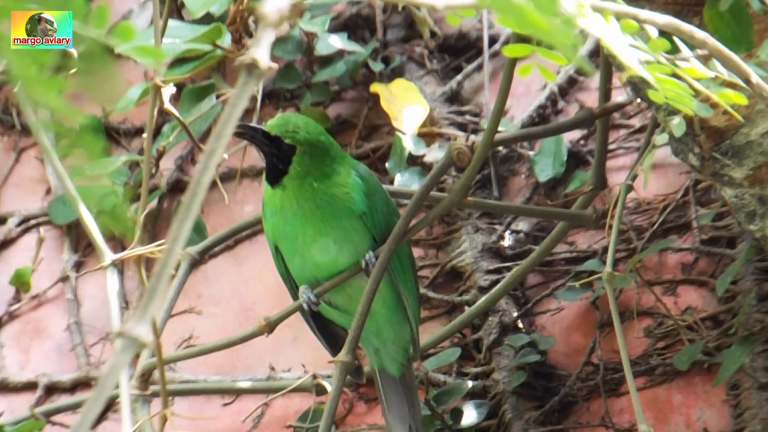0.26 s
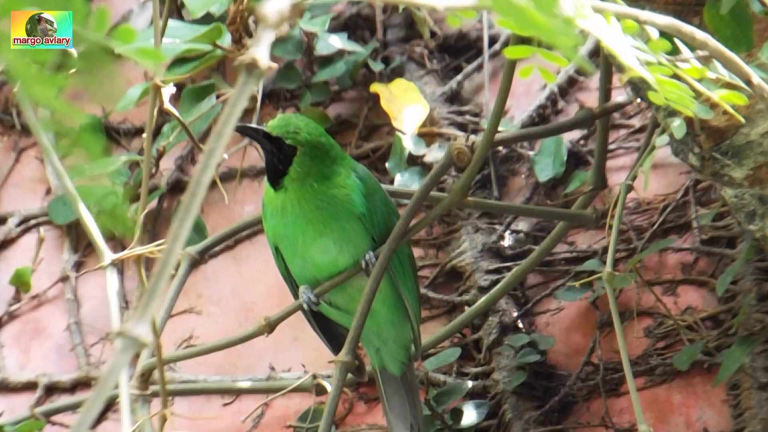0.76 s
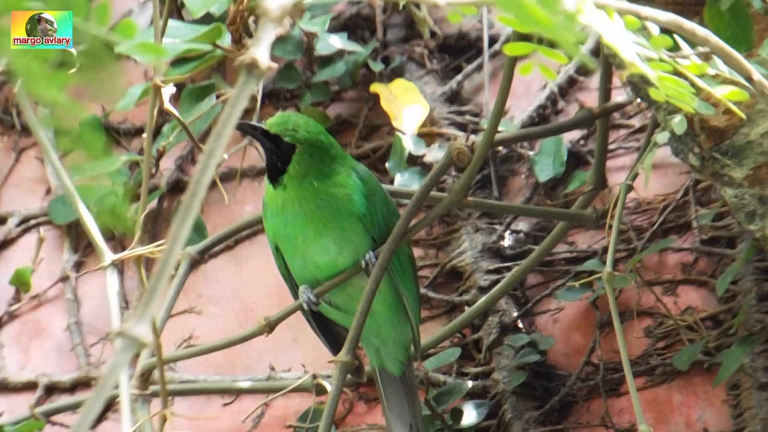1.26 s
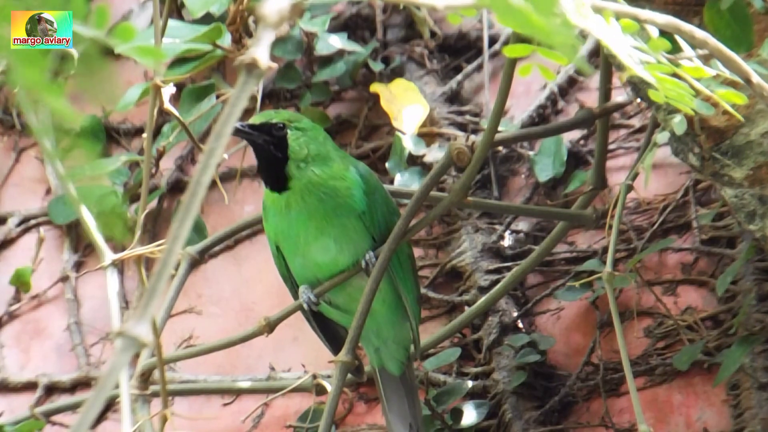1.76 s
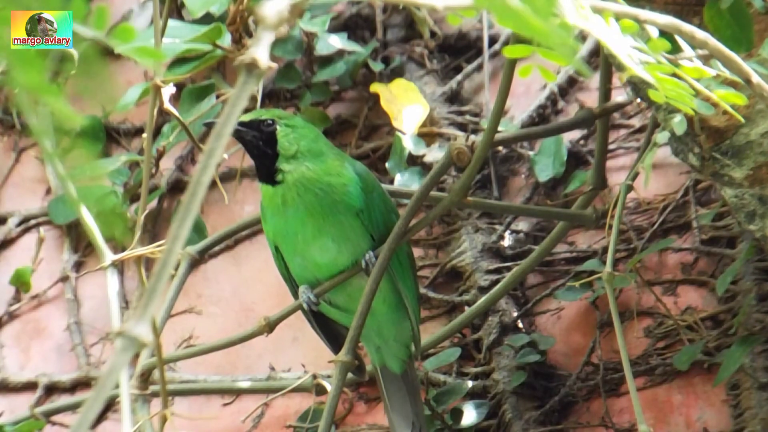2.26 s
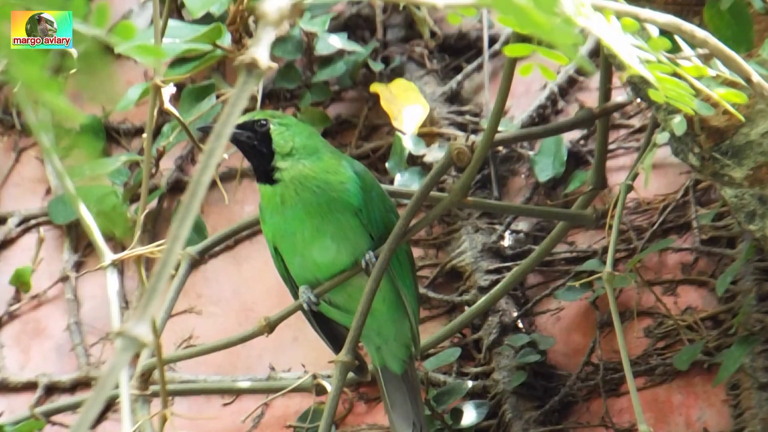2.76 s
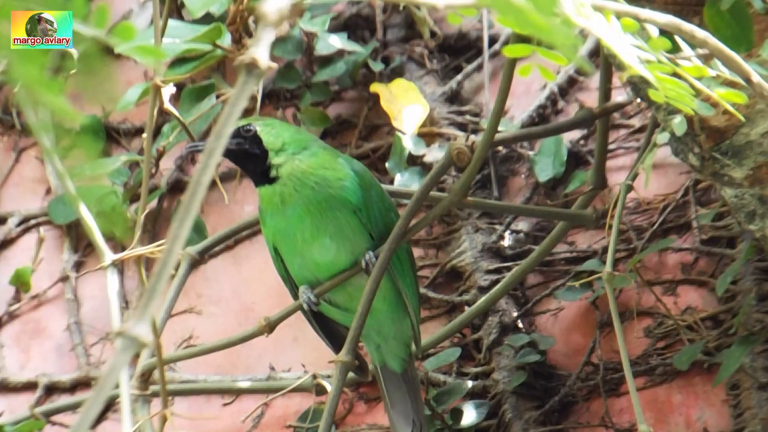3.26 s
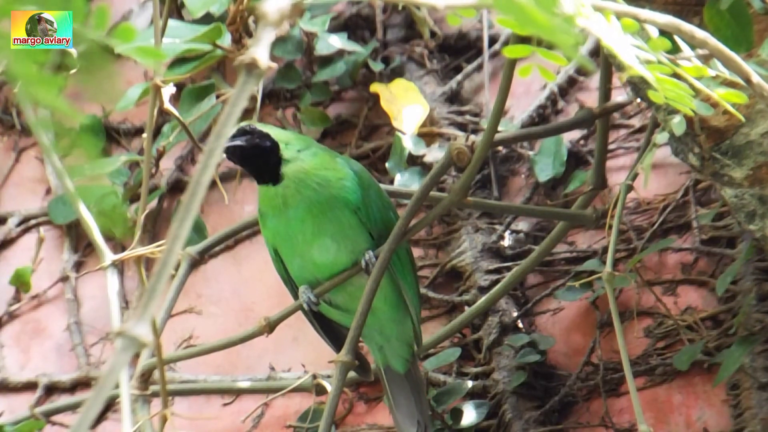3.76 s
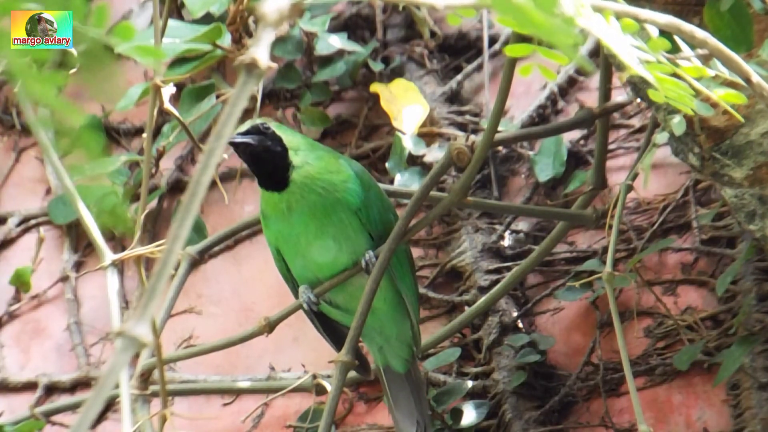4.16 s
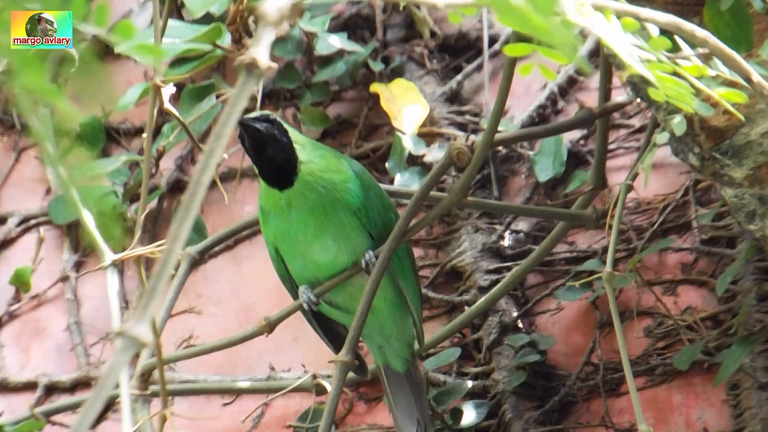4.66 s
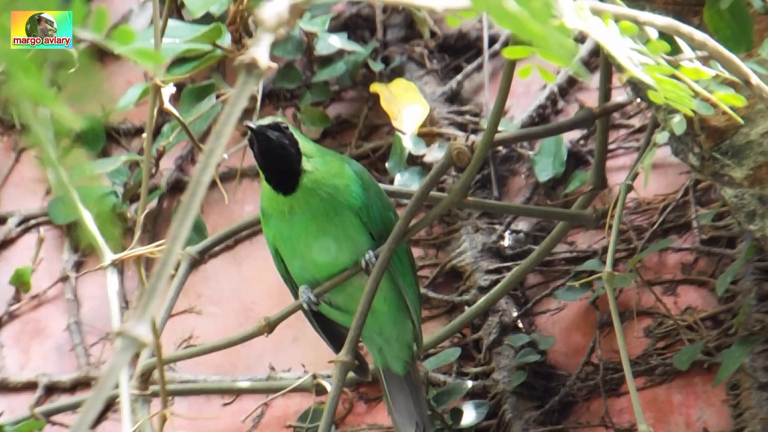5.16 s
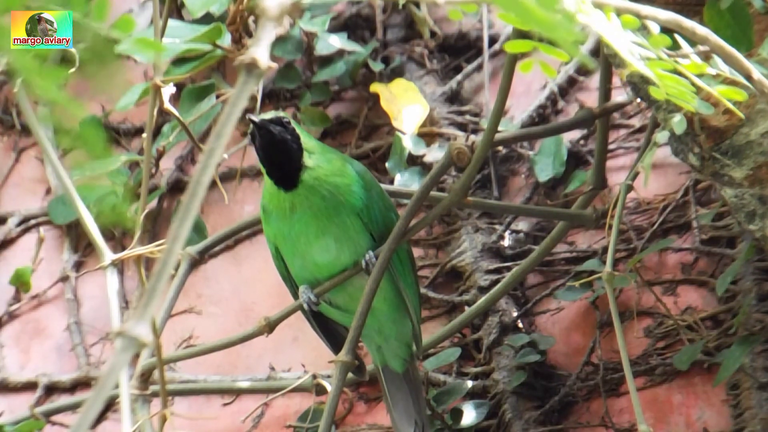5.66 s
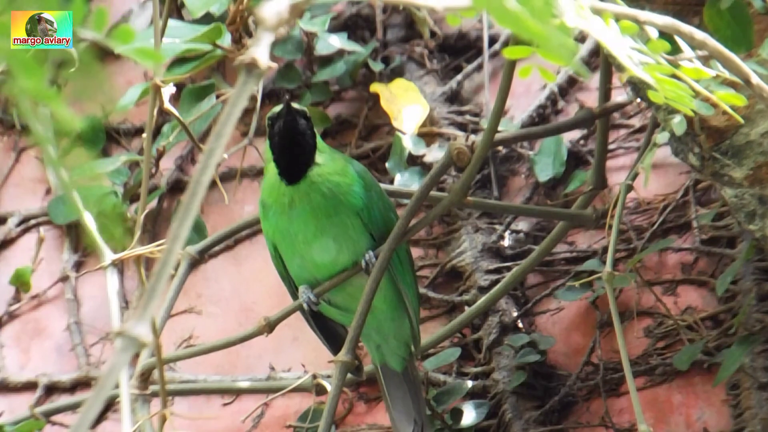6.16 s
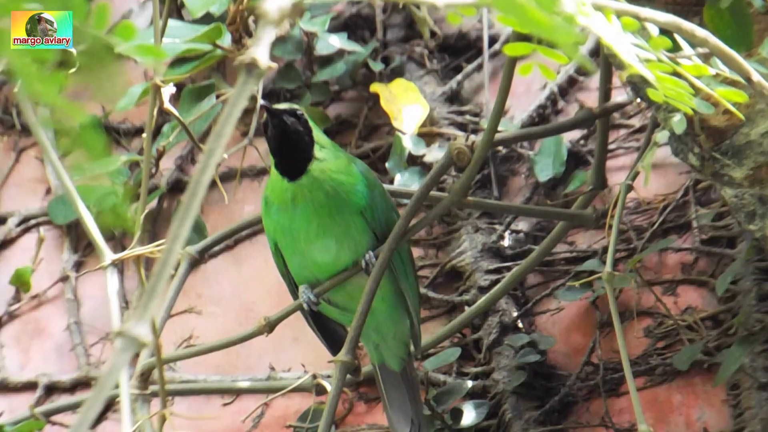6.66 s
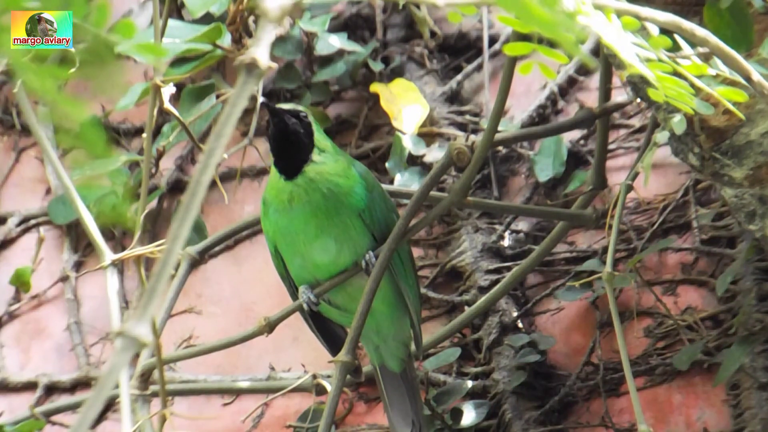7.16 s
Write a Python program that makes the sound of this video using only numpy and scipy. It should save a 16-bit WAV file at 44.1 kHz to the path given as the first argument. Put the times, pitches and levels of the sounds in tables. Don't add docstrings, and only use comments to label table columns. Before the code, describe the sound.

Inside a planted, walled aviary, dense varied birdsong starts at once, tumbling from chatter to buzzes and repeated downward phrases, most intense in the first four seconds. Brief squeaks lead to a sparser, sweeter melody of pure sliding whistles. Very faint low coos come from elsewhere. Far traffic hums and rumbles unevenly under a soft insect hiss. The close camera microphones pick up more wall reflection than direct sound, with automatic level control squeezing the loudest notes.

```python
import sys
import numpy as np
from scipy import signal
from scipy.fft import rfft, irfft, next_fast_len
from scipy.io import wavfile
from scipy.ndimage import uniform_filter1d, minimum_filter1d, map_coordinates

SR = 44100
rng = np.random.default_rng(int(sys.argv[2]) if len(sys.argv) > 2 else 0)


def master(y):
    cut = np.clip(np.atleast_2d(y).T, -1, 1)
    pcm = np.round(cut * 32767)
    wavfile.write(sys.argv[1], SR, pcm.astype(np.int16))


def decibels_to_gain(level_db):
    exponent = np.asarray(level_db, float) / 20
    return 10 ** exponent


N = 326340
LEAD = 0.3
BEAK = signal.butter(6, 2150, "high", fs=SR, output="sos")
STEADY, QUAVER, BURR, LOOSE, LISP, BUZZ = 0.01, 0.0275, 0.08, 0.1, 0.117, 0.19
PIPE = dict(overtone_db=-24.5, settle=1.8, rasp_db=-49, throb_db=3.5, soft=0.13)


def unit(x):
    return x / np.sqrt(np.mean(x ** 2) + 1e-20)


def along(points, hz):
    f, v = np.transpose(points)
    return np.interp(np.log(hz + 1), np.log(f + 1), v)


def wobble(rate, size):
    knots = rng.standard_normal(int(rate / 4) + 4)
    return map_coordinates(knots, [np.arange(size) * rate / SR])


def stereo(pair, colour):
    # frequency in Hz, likeness of left and right from 0 to 1.
    likeness = [(25, 0.95), (125, 0.21), (300, 0.4), (600, 0.81), (1500, 0.94), (4000, 0.93), (8000, 0.67),
                (13000, 0.1)]
    # frequency in Hz, left over right in dB.
    left_lean = [(25, 4), (125, -2), (500, 1.5), (1500, 2), (3000, 3), (5500, 7), (9000, 1), (13000, 1)]
    size = pair.shape[1]
    padded = next_fast_len(size + 8192)
    hz = np.fft.rfftfreq(padded, 1 / SR)
    spread = np.arccos(np.clip(along(likeness, hz), -1, 1)) / 2
    coloured = rfft(pair, padded) * decibels_to_gain(along(colour, hz))
    mid, side = coloured * [np.cos(spread), np.sin(spread)]
    tilt = decibels_to_gain(along(left_lean, hz) / 2)
    return irfft([(mid + side) * tilt, (mid - side) / tilt], padded)[:, :size]


def town():
    # time in seconds, traffic level in dB.
    traffic = [(0, -40), (1.05, -38.5), (2.08, -39.5), (2.49, -36.5), (3.54, -39.5), (3.9, -35.5),
               (4.72, -38), (5.44, -37), (7.4, -37)]
    # time in seconds, swell of the rumble in dB.
    passes = [(.62, 3.5), (1.05, 6), (2.7, -1.5), (4.9, 1), (5.45, 3.5), (7.35, 5)]
    # frequency in Hz, level in dB per Hz.
    hum_colour = [(70, -12.5), (120, 0), (260, -5), (390, -2.5), (470, -4.5), (580, -1.5), (1000, -4),
                  (1600, -6.5), (2300, -10), (4300, -11.5), (5600, -5), (7000, -12), (9000, -19),
                  (15500, -28)]
    # frequency in Hz, level in dB per Hz.
    rumble_colour = [(10, -20.5), (30, 2), (45, -5.5), (62, -1.5), (90, -9.5), (200, -32.5)]
    t = np.arange(N) / SR
    traffic_db = np.interp(t, *np.transpose(traffic))
    lumps_db = 0.4 * map_coordinates(rng.standard_normal(60), [t * 5.8])
    for s, db in passes:
        lumps_db = lumps_db + db * np.exp(-((t - s) / 0.14) ** 2)

    z = signal.stft(rng.standard_normal((2, N)), nperseg=512)[2]
    field = uniform_filter1d(rng.standard_normal(z.shape[1:]), 5, 0)
    field = uniform_filter1d(field, 12, 1)
    patches = decibels_to_gain(1.7 * np.tanh(unit(field)))
    patchy = signal.istft(z * patches, nperseg=512)[1][:, :N]
    hum = decibels_to_gain(traffic_db + 9) * unit(stereo(patchy, hum_colour))
    noise = rng.standard_normal((2, N))
    rumble = decibels_to_gain(traffic_db + 0.5 + lumps_db) * unit(stereo(noise, rumble_colour))
    return hum + rumble


def add(song, s, length, from_hz, to_hz, db, warble_hz,
        overtone_db, settle, rasp_db, throb_db, soft, root_db=0):
    # frequency in Hz, gain in dB.
    throat = [(1000, 18), (2300, -3.5), (3300, 4), (4600, 3.5), (5800, 2.5), (6800, -1.5), (8400, -6.5),
              (10000, -7.5), (13400, -16.5), (16000, -36)]
    u = np.linspace(0, 1, int(np.clip(length, 0.002, 0.24) * SR))
    flutter, throb, rattle = (wobble(rate, len(u)) for rate in (220, 90, 2600))
    hz = to_hz + (from_hz - to_hz) * (1 - u) ** settle + warble_hz * flutter
    phase = 2 * np.pi * np.cumsum(hz) / SR
    tone = 0
    for k in range(7):
        partial_hz = hz * (k + 1)
        partial_db = overtone_db * k + along(throat, np.abs(hz) * (k + 1))
        if k == 0:
            partial_db = partial_db + root_db
        audible = partial_hz < SR / 2
        tone = tone + decibels_to_gain(partial_db) * audible * np.sin((k + 1) * phase)
    tone = unit(tone)
    haze = signal.sosfilt(BEAK, rattle * tone)
    swell = decibels_to_gain(db + throb_db * throb) * np.abs(np.sin(np.pi * u ** 0.77)) ** soft
    song[round((s + LEAD) * SR):][:len(u)] += swell * (tone + decibels_to_gain(rasp_db) * haze)


def add_notes(song, notes, warble, **voice):
    for s, length, from_hz, to_hz, db in notes:
        add(song, s, length, from_hz, to_hz, db, warble * (from_hz + to_hz) / 2, **voice)


def chatter(song):
    # start in seconds, length in seconds, start Hz, end Hz, level in dB.
    loose_notes = [(-.08, 0.097, 3205, 3267, -17), (0, 0.08, 3592, 3140, -22),
                   (0.275, 0.092, 3900, 2650, -16), (0.401, 0.049, 3967, 2930, -12),
                   (0.457, 0.065, 3400, 3030, -20), (0.957, 0.032, 2306, 3245, -29.5),
                   (1.651, .11, 2580, 3300, -17.5), (1.8, 0.015, 3790, 2320, -10.5),
                   (3.094, .08, 2812, 3200, -20), (3.172, 0.074, 3303, 3090, -14),
                   (3.257, 0.046, 3920, 2890, -9.5), (3.692, 0.038, 2950, 2870, -30)]
    # start in seconds, length in seconds, start Hz, end Hz, level in dB.
    held_notes = [(0.042, 0.035, 2262, 1870, -22), (1.759, 0.039, 3346, 3400, -12.5),
                  (1.828, 0.028, 3406, 3280, -8), (1.836, 0.0235, 3044, 2820, -17),
                  (3.14, 0.031, 2576, 2770, -20.5), (3.2, 0.034, 3220, 2840, -20)]
    for notes, warble in [(loose_notes, LOOSE), (held_notes, QUAVER)]:
        add_notes(song, notes, warble, overtone_db=-3, settle=1.3, rasp_db=-4, throb_db=4.5, soft=0.21)


def risers(song):
    # start in seconds, length in seconds, start Hz, end Hz, level in dB.
    rising_notes = [(0.122, 0.033, 3820, 4256, -10.5), (0.235, 0.044, 4890, 5380, -15),
                    (3.327, 0.032, 4140, 5600, -9.5), (3.357, 0.031, 5400, 4420, -25)]
    add_notes(song, rising_notes, 0.0094,
              overtone_db=-6.5, settle=1.6, rasp_db=-2.5, throb_db=-3, soft=0.21)


def pipes(song):
    # start in seconds, length in seconds, start Hz, end Hz, level in dB.
    quavers = [(0.155, 0.11, 4300, 4140, -24), (.345, 0.0294, 6150, 5800, -12),
               (.425, 0.031, 6100, 5880, -18.5), (1.07, 0.024, 2550, 2100, -23.5),
               (1.395, 0.039, 2480, 2575, -18.5), (2.32, 0.024, 4350, 4880, -30),
               (2.368, 0.027, 2425, 2395, -21), (2.401, 0.029, 2290, 1980, -23.5),
               (2.42, 0.057, 2404, 2477, -21.5), (2.599, 0.049, 2091, 2160, -20.5),
               (3.306, 0.034, 3140, 4300, -11), (3.4, 0.014, 4450, 4760, -16),
               (4.645, 0.034, 1953, 1726, -29.5), (4.675, 0.052, 1690, 1847, -22),
               (5.492, 0.031, 1720, 1890, -30), (5.507, 0.038, 1850, 1375, -27),
               (6.545, 0.032, 2280, 2130, -22.5), (6.575, 0.012, 1970, 1780, -30),
               (6.976, 0.037, 4860, 4750, -26.5), (7.357, 0.067, 2140, 1760, -23)]
    # start in seconds, length in seconds, start Hz, end Hz, level in dB.
    whistles = [(0.972, 0.0235, 2744, 3207, -24), (.993, 0.023, 3207, 3090, -8.5),
                (1.025, 0.04, 3096, 2850, -18.5), (1.478, 0.026, 2593, 2580, -21),
                (1.619, 0.041, 2297, 2586, -19), (1.93, 0.032, 2440, 2430, -27),
                (2.14, 0.027, 2430, 2340, -21), (2.197, 0.03, 2460, 2450, -24)]
    # start in seconds, length in seconds, start Hz, end Hz, level in dB.
    flurries = [(2.468, 0.025, 5680, 4820, -15.5), (4.83, 0.035, 5280, 4240, -28),
                (3.98, 0.1, 2216, 2030, -27), (4.477, 0.025, 5080, 5040, -18.5),
                (4.486, 0.019, 3700, 3270, -19.5), (5.202, 0.038, 4810, 4280, -26.5),
                (6.55, 0.061, 5420, 4220, -26.5), (6.777, 0.18, 5900, 5680, -42),
                (6.88, 0.043, 5840, 3800, -38), (7.02, 0.032, 4640, 3390, -30)]
    for notes, warble in [(quavers, QUAVER), (whistles, STEADY), (flurries, LISP)]:
        add_notes(song, notes, warble, **PIPE)


def chips(song):
    # start in seconds, length in seconds, start Hz, end Hz, level in dB.
    sweeps = [(0.31, 0.0043, 6400, 5420, -20), (0.335, 0.0043, 6440, 5350, -4.5),
              (1.03, 0.0072, 6400, 5400, -12.5), (1.031, 0.012, 5070, 4260, -20),
              (1.303, 0.005, 6400, 5300, -23), (1.66, .012, 7830, 4570, -25),
              (1.708, 0.0054, 6150, 5600, -16), (1.753, 0.012, 7420, 5250, -14),
              (2.47, .006, 8560, 5500, -15.5), (3.104, .015, 7980, 4450, -25),
              (3.215, 0.0093, 7630, 5740, -12), (3.505, 0.016, 8380, 4880, -16.5)]
    add_notes(song, sweeps, 0.04, overtone_db=-10, settle=1.3, rasp_db=-4, throb_db=2, soft=0.3)


def buzzes(song):
    # start in seconds, length in seconds, start Hz, end Hz, level in dB.
    harsh_notes = [(0.53, 0.21, 2980, 4300, -29), (1.245, 0.025, 4200, 2550, -21),
                   (1.66, 0.12, 3100, 6510, -36), (2.0, 0.047, 3000, 4380, -16),
                   (3.47, 0.031, 4250, 3020, -20.5), (3.795, 0.12, 4365, 3900, -23.5),
                   (3.835, 0.123, 4220, 4260, -22), (3.91, 0.16, 4220, 3926, -16.5),
                   (4.0, 0.15, 3920, 3564, -18)]
    # start in seconds, length in seconds, start Hz, end Hz, level in dB.
    burrs = [(2.715, 0.066, 2984, 3833, -20.5), (3.5, 0.048, 4380, 4460, -34), (3.85, .23, 3080, 2460, -29)]
    for notes, warble in [(harsh_notes, BUZZ), (burrs, BURR)]:
        add_notes(song, notes, warble, overtone_db=-7, settle=1.4, rasp_db=4.5, throb_db=-2.5, soft=1)


def refrain(song):
    # seconds after the phrase starts, length in seconds, start Hz, end Hz, warble in Hz.
    phrase = [
        (-.006, .04, 2826, 3689, 218.5),
        (0.015, 0.0245, 2644, 2284, 150),
        (0.032, 0.052, 3427, 3283, 80.2),
        (0.082, 0.0262, 2883, 2813, 65),
        (0.107, .09, 2159, 1723, 133.8),
        (0.194, .12, 1741, 1230, 95.5),
    ]
    # start in seconds, then levels in dB of the squeak, rasp, held note and step.
    renditions = [(0.589, -18, -12, -9, -18), (1.235, -24, -12.5, -7.5, -11),
                  (1.993, -18, -13, -6.5, -11.5), (2.662, -14.5, -15, -8, -10),
                  (3.471, -31, -15.5, -11, -12), (4.172, -17.5, -8.5, -8.5, -12)]
    for s, squeak_db, rasp_db, held_db, step_db in renditions:
        levels = [rasp_db, squeak_db, held_db, step_db, -21.5, -31.5]
        for (after, length, from_hz, to_hz, warble_hz), db in zip(phrase, levels):
            add(song, s + after, length, from_hz, to_hz, db, warble_hz,
                overtone_db=-4.5, settle=1.3, rasp_db=-8, throb_db=1.5, soft=0.48)


def coos(song):
    # start in seconds, length in seconds, pitch in Hz, level in dB.
    low_calls = [(0.741, 0.15, 293.6, -46.5), (2.9, 0.15, 497, -43), (4.16, 0.085, 909, -38),
                 (5.042, 0.17, 564, -43), (5.8, 0.084, 1118, -40), (6.352, 0.3, 598, -44),
                 (6.888, 0.079, 707, -41), (7.092, 0.02, 887, -33)]
    sag = 0.023
    notes = [(s, length, hz, hz * (1 - sag), db) for s, length, hz, db in low_calls]
    add_notes(song, notes, STEADY, **PIPE)


def squeaks(song):
    # start in seconds, length in seconds, start Hz, end Hz, level in dB.
    squeaky_notes = [(4.341, 0.05, 2276, 2300, -24), (4.388, 0.0508, 2418, 2266, -16.5),
                     (4.435, 0.065, 2290, 2168, -15.5)]
    add_notes(song, squeaky_notes, QUAVER, overtone_db=-1.5, settle=1.29, rasp_db=-6.5,
              throb_db=3, soft=0.31, root_db=-6.5)


def melody(song):
    # start in seconds, length in seconds, start Hz, end Hz, level in dB.
    slurs = [(4.71, 0.028, 2430, 2530, -31.5), (4.933, 0.036, 3130, 3734, -17),
             (4.837, 0.034, 2510, 2796, -25.5), (5.036, 0.081, 1697, 1897, -19.5),
             (5.065, 0.036, 3204, 3700, -15), (5.125, .1, 3080, 2550, -21), (5.34, 0.057, 2416, 2730, -22),
             (5.393, 0.055, 2577, 3258, -15), (5.56, 0.049, 3295, 4340, -11.5),
             (5.674, 0.12, 3230, 2796, -18.5), (5.873, 0.022, 2574, 2764, -16.5),
             (5.9, 0.045, 2794, 3820, -11), (6.058, 0.054, 1516, 1386, -26.5),
             (6.584, 0.0767, 2546, 2833, -18), (7.14, 0.039, 1680, 1887, -32.5),
             (7.174, 0.086, 1860, 2106, -37.5), (7.171, 0.077, 3870, 3970, -41),
             (7.301, 0.054, 2190, 2518, -18.5), (7.33, 0.029, 2820, 3080, -18)]
    add_notes(song, slurs, STEADY, overtone_db=-24, settle=2.1, rasp_db=-17, throb_db=1, soft=0.35)


def birds():
    song = np.zeros(N + 2 * SR)
    for sing in (chatter, risers, pipes, chips, buzzes, refrain, coos, squeaks, melody):
        sing(song)
    return song


def aviary(x):
    # frequency in Hz, time to die by 60 dB in seconds.
    wall_decay = [(500, 1), (1500, 0.58), (3000, 0.65), (6000, 0.45), (12000, 0.38)]
    hz, t, z = signal.stft(rng.standard_normal((2, SR)), SR, nperseg=256)
    fade = decibels_to_gain(-60 * t / along(wall_decay, hz)[:, None])
    fade = fade + 0.63 * decibels_to_gain(-60 * t / 0.28)
    tail = signal.istft(z * fade, SR, nperseg=256)[1]
    build_up = 1 - np.exp(-np.arange(tail.shape[1]) / SR / 0.0094)
    tail = tail * build_up / np.linalg.norm(tail[0])
    tail[0, 0] = decibels_to_gain(-6)
    heard = signal.fftconvolve(x[None], tail, axes=1)[:, round(LEAD * SR):][:, :N]
    return stereo(heard, [(100, 0)])


def scene():
    return decibels_to_gain(4.5) * aviary(birds()) + town()


def low_pass(x):
    return signal.sosfilt(signal.butter(12, 15360, fs=SR, output="sos"), x)


def record(dry):
    loudest = np.max(dry ** 2, axis=0)
    power = -minimum_filter1d(-loudest, size=661, origin=330)
    for seconds in (0.006, 0.04):
        memory = np.exp(-1 / (seconds * SR))
        power = signal.lfilter([1 - memory], [1, -memory], power)
    x = dry / (1 + power / decibels_to_gain(0.5)) ** 0.48
    x = x / (1 + np.abs(x) ** 8) ** (1 / 8)
    in_band = np.fft.rfftfreq(N, 1 / SR) < 15360
    x = irfft(rfft(x) * in_band, N)
    return low_pass(x)


dry = scene()
out = record(dry)
master(out)
```